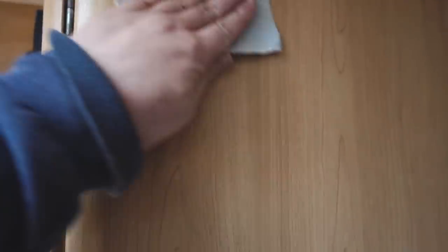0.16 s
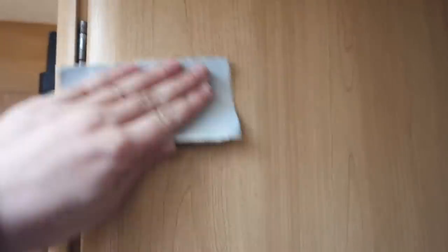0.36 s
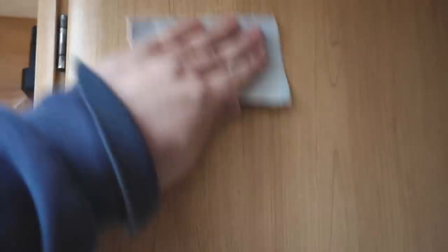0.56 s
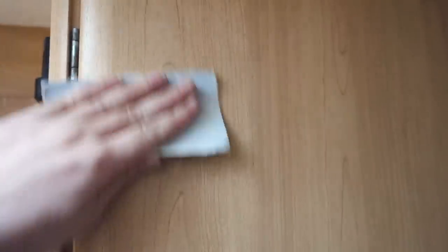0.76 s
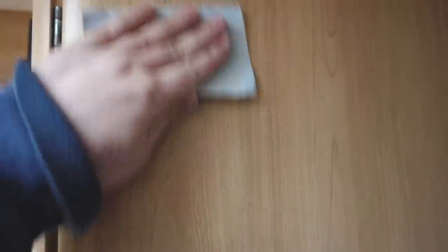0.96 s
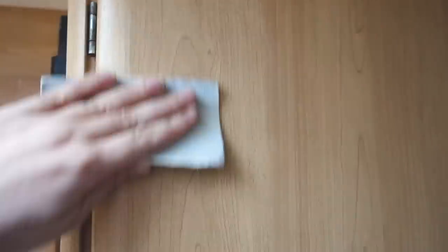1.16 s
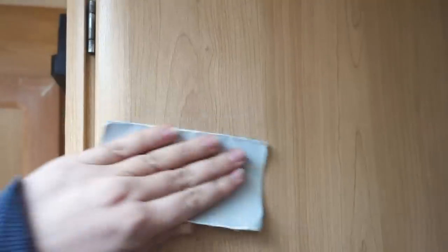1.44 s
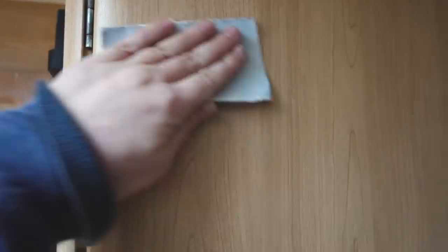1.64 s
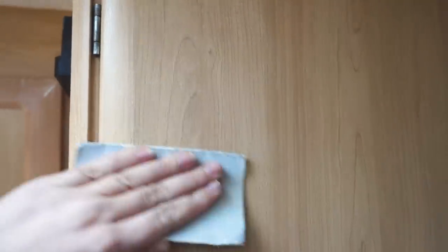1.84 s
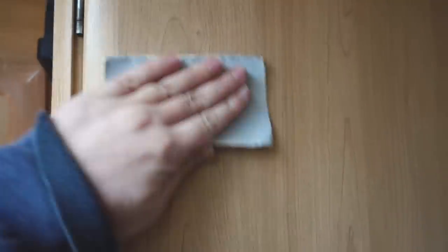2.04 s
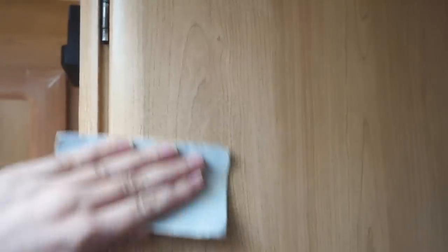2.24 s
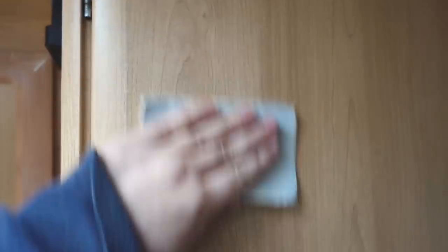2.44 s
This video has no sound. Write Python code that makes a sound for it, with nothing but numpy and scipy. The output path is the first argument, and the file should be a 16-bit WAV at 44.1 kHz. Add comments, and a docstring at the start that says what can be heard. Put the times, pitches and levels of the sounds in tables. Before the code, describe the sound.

Close stereo sound of hand sanding on a wooden panel: unbroken scratchy hiss swelling and dipping quickly, hollow door resonance and low rumble underneath, then a thin whistling edge in the hiss near the end.

```python
"""Sandpaper rubs in loops over a wooden cabinet door, worked by hand close to a pair of microphones.
Its hiss is thousands of random grit clicks, filtered in bands; it sinks and changes colour as the hand turns.
The door hums in its decaying modes under the grit and judders in runs of slips where the paper grips.
Below lie a low rumble of room and cabinet and soft cabinet bumps; late on, a narrow whistle of
filtered grit glides within the hiss. Nearby surfaces return weak echoes of hiss and whistle."""
import sys
import numpy as np
from scipy import signal
from scipy.fft import rfft, irfft
from scipy.io import wavfile
from scipy.ndimage import map_coordinates

SR = 44100
rng = np.random.default_rng(int(sys.argv[2]) if len(sys.argv) > 2 else 0)


def master_out(mix):
    """Clip the mix to full scale and print it as 16-bit PCM to the path in sys.argv[1]."""
    frames = np.transpose(np.atleast_2d(mix))
    ceiling = np.clip(frames, -1, 1)
    pcm = np.round(ceiling * 32767).astype(np.int16)
    wavfile.write(sys.argv[1], SR, pcm)


N = 114660
TIME_S = np.arange(N) / SR


def amp(db):
    """Turn decibels into an amplitude factor."""
    return 10 ** (np.asarray(db) / 20)


def rms_one(x):
    """Scale a signal to an RMS of one."""
    return x / np.sqrt(np.mean(x ** 2) + 1e-20)


def in_time(rows):
    """Interpolate each column of a timed table over every sample."""
    s, *columns = np.transpose(rows)
    return [np.interp(TIME_S, s, column) for column in columns]


def at_hz(points, hz):
    """Read a frequency curve on a logarithmic frequency axis."""
    curve_hz, value = np.array(points).T[:2]
    return np.interp(np.log(hz), np.log(curve_hz), value)


def drift(rate_hz):
    """Slow random wander of spread 1: noise through a two-pole low-pass at rate_hz."""
    step = 40   # samples between slow values
    r = np.exp(-2 * np.pi * rate_hz * step / SR)
    noise = rng.standard_normal(N // step + 2002)
    slow = signal.lfilter([1], [1, -2 * r, r * r], noise)[2000:]   # skip the filter's start
    slow = rms_one(slow - slow.mean())
    return np.interp(np.arange(N) / step, np.arange(len(slow)), slow)


def ring(x, hz, t60_s):
    """Two-pole resonance: a unit click starts a decaying sine that falls 60 dB in t60_s."""
    r = amp(-60 / (t60_s * SR))
    w = 2 * np.pi * hz / SR
    return signal.lfilter([0, np.sin(w)], [1, -2 * r * np.cos(w), r * r], x + 1e-18)


GRIT_PER_S, GRIT_SPREAD_DB = 16000, 2.5   # mean clicks per second; scale of the random click heights


def grit(size):
    """Grit points catching the wood: dense random clicks of uneven size and sign."""
    height = amp(GRIT_SPREAD_DB * np.minimum(rng.exponential(1, size), 5.0))
    sign = rng.choice([-1, 1], size)
    strikes = rng.random(size) < GRIT_PER_S / SR
    return rms_one(height * sign * strikes)


# how alike the two microphones hear a band: f/Hz, left-right likeness (1 = identical)
MIC_LIKENESS = [(60, .9995), (210, .9995), (330, 1), (640, 0.77), (1410, 0.85), (3100, 0.81), (6820, 0.81),
                (10000, 0.52), (15000, 0.1)]
# balance of the microphone pair: f/Hz, left minus right level/dB
MIC_BALANCE = [(60, 0.0), (130, 0.0), (290, 0.0), (640, 0.5), (1410, 1.0), (3100, 0.5), (6820, 1.5),
               (15000, -1.0)]


def bank(source, low_hz, high_hz, gain_db, count):
    """Filter centre and side noise into bands, each with its own gain, stereo likeness and balance."""
    out = 0
    edges = np.geomspace(low_hz, high_hz, count + 1)
    for k, (low, high) in enumerate(zip(edges, edges[1:])):
        band = signal.butter(3, [low, high], "band", fs=SR, output="sos")
        mid, side = signal.sosfilt(band, source[k % 2])   # neighbouring bands use separate noise
        hz = np.sqrt(low * high)
        alike = np.clip(at_hz(MIC_LIKENESS, hz), 0, 1)
        lean_db = at_hz(MIC_BALANCE, hz) / 2
        pair = np.sqrt(1 + alike) * mid + np.sqrt(1 - alike) * side * [[1], [-1]]
        out = out + amp(gain_db(hz)) * amp([[lean_db], [-lean_db]]) * pair
    return rms_one(out)


# the rubbing strokes, before trim; the function uses all but the first level as swings about their means:
# t/s, hiss level/dB near 4 kHz, then relative to it 6 kHz level/dB, treble level/dB,
# rasp level/dB near 2 kHz, rasp level/dB near 1.3 kHz; last, left minus right level/dB
RUB_STROKES = [(0.01, -26, -0.5, -3.5, -16, -15, 1.0), (0.18, -27.5, 2.5, -1.5, -7.5, -18, 1.5),
               (0.32, -28.5, 3, -1, -7, -9.5, 0.5), (0.53, -28, 2.5, 0, -10.5, -20, 1.5),
               (0.58, -25, 1, -5, -12, -21, 2.0), (0.59, -29.5, 6, 1, -4.5, -16, 1),
               (0.74, -26.5, 1.5, -3, -15.5, -15, 1), (0.8, -24.5, -2, -4, -13, -18, 2),
               (0.82, -27, 2, -3, -9, -19, 0), (0.84, -28, 2.5, -0.5, -9, -16, 2),
               (0.96, -27.5, 3, -5, -8, -22, 2), (1.06, -28, 4, -2.5, -8, -19.5, 2.5),
               (1.12, -26, -2.5, -3.5, -16.5, -21, 1.5), (1.22, -30, 1.5, -6, -5.5, -15.5, 1.5),
               (1.27, -26, -0.5, -2.5, -15.5, -23, 2.0), (1.34, -28.5, 4.5, -4, -7, -20, 1.5),
               (1.43, -25, -1.5, -3, -22, -22, 1.0), (1.45, -28.5, 5, 0, -9, -16, 0.5),
               (1.46, -25, -2, -2.5, -15, -25.5, 1), (1.55, -28, 0.5, -6, -12, -15.5, 1.0),
               (1.75, -25, 1.5, -3, -14.5, -22.5, 1.5), (1.92, -30, 1.5, 0, -7, -15.5, 0.5),
               (1.97, -33.5, 0.5, -6.5, -2.5, -9, 2), (2.02, -28.5, 1.5, 1, -9, -14, 1.5),
               (2.04, -25.5, -2, -5, -16.5, -19, 0.5), (2.11, -28, 2, -2.5, -8.5, -18.5, 2),
               (2.17, -25.5, -0.5, -1, -13, -22, 1), (2.28, -31, 3.5, 1, -5, -12.5, 0.5),
               (2.34, -26, -2.5, -2.5, -15.5, -18, 3), (2.36, -32, 2.5, 5.5, -6, -17, 1.5),
               (2.41, -27, 1, -1.5, -13.5, -21.5, 2), (2.51, -27, 0, -0.5, -18.5, -21, 1.5),
               (2.54, -27.5, 2, -2, -10.5, -14, 0.5), (2.58, -25, -3, -3, -15.5, -18, 1)]
# average colour of the scratching, before overall scaling: f/Hz, level/dB per Hz
SCRATCH_COLOUR = [(470, -44), (800, -20), (940, -22), (1240, -14.5), (1550, -14), (1820, -9), (2080, -12),
                  (3830, -1), (4450, -0.5), (7780, -4), (10400, -3), (15600, -10)]
# where each of the five stroke level columns holds in full, in column order: f/Hz
STROKE_HZ = [3870, 6100, 12100, 1950, 1460]
# the hand all but halts and the upper hiss dips: t/s, width/s from centre to 1/e, level/dB
HAND_STOPS = [(1.21, 0.016, -2), (1.966, 0.014, -0.5)]
FLUTTER_DB, PATCH_DB, SCRATCH_TRIM_DB = 0.5, 1, 7


def scratch():
    """Sandpaper on wood, close up: grit clicks in narrow bands follow the strokes and wander in patches."""
    level_db, *against_db, pan_db = in_time(RUB_STROKES)
    swings = [0 * level_db] + [column - column.mean() for column in against_db]
    flutter = drift(5.4) + drift(25)
    stop_db = sum(db * np.exp(-((TIME_S - s) / width_s) ** 2) for s, width_s, db in HAND_STOPS)
    order = np.argsort(STROKE_HZ)
    anchors = np.log(np.sort(STROKE_HZ))

    def gain_db(hz):
        """Level of one band over time, shared between its nearest stroke columns."""
        shares = [np.interp(np.log(hz), anchors, order == k) for k in range(len(STROKE_HZ))]
        colour_db = sum(share * swing for share, swing in zip(shares, swings))
        upper_db = (FLUTTER_DB * flutter + stop_db) * (hz > STROKE_HZ[3])   # only above the 2 kHz rasp
        stroke_db = level_db - level_db.mean() + colour_db
        return at_hz(SCRATCH_COLOUR, hz) + stroke_db + upper_db + PATCH_DB * drift(9.9)

    hiss = bank(grit((2, 2, N)), 795.2, 16840, gain_db, count=36)
    lean_db = (pan_db - pan_db.mean()) / 2
    return amp(level_db.mean() + SCRATCH_TRIM_DB) * hiss * amp([lean_db, -lean_db])


ECHO_FIRST_S, ECHO_LAST_S, ECHO_WANDER_S = .0012, .012, .0002   # delay range; spread of each delay's drift
ECHO_DB = -21   # each echo against the direct sound, before their sum is scaled


def echoes(x, count=12):
    """Nearby surfaces return weak early echoes whose path lengths drift as the hand moves."""
    out = x
    for k, lag_s in enumerate(rng.uniform(ECHO_FIRST_S, ECHO_LAST_S, count)):
        lag = (lag_s + ECHO_WANDER_S * drift(2.48)) * SR
        at = np.abs(np.arange(N) - lag)
        echo = np.array([map_coordinates(c, [at], order=3, mode="nearest") for c in x])
        out = out + (-1) ** k * amp(ECHO_DB) * echo
    return out / np.sqrt(1 + count * amp(2 * ECHO_DB))


# modes of the wooden door: f/Hz, relative level/dB, 60 dB decay/s
DOOR_MODES = [(114.5, -15, 0.16), (138, -10.5, 0.14), (206, -17, 0.13), (232, 3, 0.12), (321, -2.5, 0.14),
              (403.7, -5.5, 0.11), (527.4, -0.5, 0.068), (637, -4.5, 0.071), (772.5, 1, 0.046),
              (854, -9, 0.059), (1283, -9, 0.09), (1436, -13, 0.05), (1770, -1, 0.046)]
# how hard the paper drives the door, before trim: t/s, low-mode level/dB,
# upper-mode level/dB against the low modes (used as a swing about its mean)
PAPER_DRIVE = [(0.01, -42, -0.5), (0.09, -47.5, -2), (0.22, -47.5, 3), (0.31, -55.5, 13), (0.36, -44.5, 1),
               (0.49, -48, 1.5), (0.52, -46, -0.5), (0.81, -52.5, 7), (0.85, -66, 20), (0.89, -44, -12),
               (0.99, -49.5, 9), (1.08, -46, -10), (1.1, -52.5, 10), (1.15, -43, -6), (1.17, -51.5, 9),
               (1.22, -52, 1.5), (1.68, -50, 0), (1.7, -40, -7), (1.79, -53.5, 12.5), (1.83, -44, -8.5),
               (1.9, -64.5, 24), (1.96, -37.5, -14), (1.99, -47, -3), (2.13, -46, -2.5), (2.18, -58.5, 12),
               (2.47, -50.5, 0), (2.53, -46, -5), (2.58, -48.5, 1.5)]
# the paper grips and the door judders: t/s, length/s, slip level/dB before mode gain, favoured f/Hz
GRIP_JUDDERS = [(0.292, 0.072, -37.5, 405), (0.321, 0.064, -53, 240), (0.984, 0.064, -54, 294),
                (1.138, 0.059, -44, 413), (1.686, .04, -55, 232), (1.75, 0.042, -44, 426),
                (1.921, 0.04, -42.5, 770), (1.94, .04, -59, 215), (2.1, 0.059, -53, 260)]
SLIPS_PER_S, FAVOUR_DB_PER_OCTAVE = 900, 35   # mean slip rate; loss away from the favoured pitch
UPPER_FROM_HZ, UPPER_FULL_HZ = 260, 380   # the upper-mode swing fades in between
MODE_WANDER_DB, DOOR_TRIM_DB = 1.2, 7


def door():
    """The grit rings the door's modes, each wandering as the hand moves; judders add runs of slips."""
    drive_db, upper_db = in_time(PAPER_DRIVE)
    slips = rng.standard_normal(N) * (rng.random(N) < SLIPS_PER_S / SR)
    hum, jolt = 0, 0
    for k, (hz, db, t60_s) in enumerate(DOOR_MODES):
        upper_share = at_hz([(UPPER_FROM_HZ, 0), (UPPER_FULL_HZ, 1)], hz)
        swing_db = upper_share * (upper_db - upper_db.mean())
        drive = grit(N) * amp(MODE_WANDER_DB * drift(4.3))
        hum = hum + amp(db + swing_db) * rms_one(ring(drive, hz, t60_s))
        grip = 0
        for s, length_s, jolt_db, pitch_hz in GRIP_JUDDERS:
            arch = np.sin(np.pi * np.clip((TIME_S - s) / length_s, 0, 1))
            loss_db = FAVOUR_DB_PER_OCTAVE * abs(np.log2(hz / pitch_hz))
            grip = grip + amp(jolt_db - loss_db) * arch
        jolt = jolt + amp(db) * (-1) ** k * ring(slips * grip, hz, t60_s)   # modes alternate in sign
    return amp(drive_db + DOOR_TRIM_DB) * rms_one(hum) + jolt


# colour of the room and cabinet rumble, before overall scaling: f/Hz, level/dB per Hz
RUMBLE_COLOUR = [(15, -51), (25, -40), (60, -16.5), (115, 0.5), (150, -3), (180, -6.5), (300, 0),
                 (500, -16), (1000, -11)]
RUMBLE_DB = -53   # overall RMS


def rumble():
    """Low room and cabinet noise: filtered noise bands whose levels wander slowly."""
    noise = rng.standard_normal((2, 2, N))

    def gain_db(hz):
        """Level of one band over time."""
        return at_hz(RUMBLE_COLOUR, hz) + 2.0 * drift(2.7)

    return amp(RUMBLE_DB) * bank(noise, 25.0, 964, gain_db, count=10)


# soft bumps of the cabinet: t/s, push level/dB
CABINET_BUMPS = [(.445, -38), (.515, -45), (.77, -43), (1.0, -46), (1.58, -46), (1.65, -50), (1.89, -52),
                 (2.02, -45), (2.29, -40)]
BUMP_HZ, BUMP_T60_S = 56.4, 0.035


def bumps():
    """The cabinet bumps softly: short rounded pushes set off a heavily damped low resonance."""
    push = np.zeros(N)
    for s, db in CABINET_BUMPS:
        push[int(s * SR)] = amp(db)
    rounded = np.convolve(push, np.hanning(200) / 100)[:N]
    return ring(rounded, BUMP_HZ, BUMP_T60_S)


# a narrow whistle in the hiss of one stroke: t/s, f/Hz, level/dB against the stroke level before trim
STROKE_WHISTLE = [(1.99, 4620, -38), (2.05, 4400, -9), (2.1, 4180, -14), (2.13, 3820, -4),
                  (2.18, 4296, -10), (2.22, 4070, -14), (2.26, 4370, -3), (2.3, 4430, -6), (2.33, 4750, -3),
                  (2.365, 5320, -2), (2.39, 5400, -38)]
WHISTLE_WIDTH_HZ = 400


def whistle():
    """Low-passed grit, shifted up to a gliding pitch, makes a narrow whistle that follows the rubbing."""
    pitch_hz, share_db = in_time(STROKE_WHISTLE)
    low_pass = signal.butter(2, WHISTLE_WIDTH_HZ / 2, fs=SR, output="sos")
    slow = signal.sosfilt(low_pass, grit((2, N)))
    phase = 2 * np.pi * np.cumsum(pitch_hz) / SR
    tone = slow[0] * np.cos(phase) + slow[1] * np.sin(phase)
    return amp(in_time(RUB_STROKES)[0] + share_db) * rms_one(tone)


RIGHT_LAG_S = 2.3e-5   # about 8 mm of extra air path


def scene():
    """Sum all sources at the close pair; sound reaches the left microphone a little first."""
    left, right = echoes(scratch() + whistle()) + door() + bumps() + rumble()
    hz = np.fft.rfftfreq(N, 1 / SR)
    late = irfft(rfft(right) * np.exp(-2j * np.pi * hz * RIGHT_LAG_S), N)
    return np.array([left, late])


CUTOFF_HZ = 15750


def record(dry):
    """Cut the top of the treble steeply with an elliptic low-pass."""
    low_pass = signal.ellip(14, .2, 90, CUTOFF_HZ, fs=SR, output="sos")
    return signal.sosfilt(low_pass, dry)


dry = scene()
out = record(dry)
master_out(out)
```